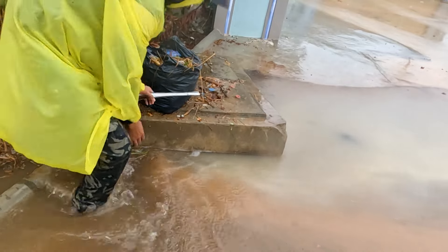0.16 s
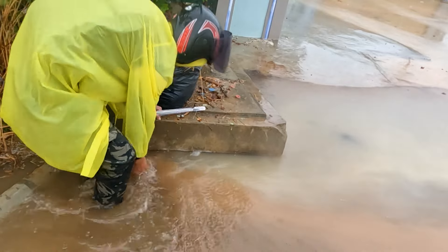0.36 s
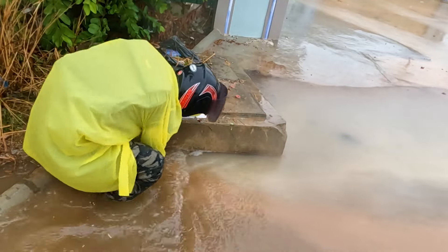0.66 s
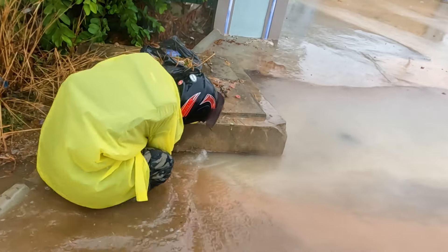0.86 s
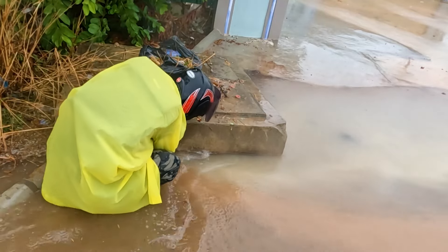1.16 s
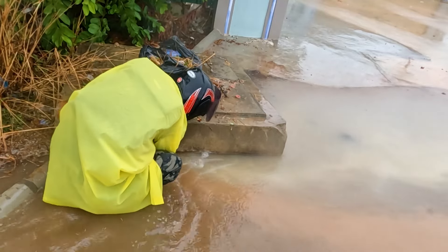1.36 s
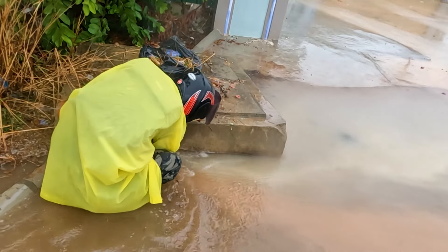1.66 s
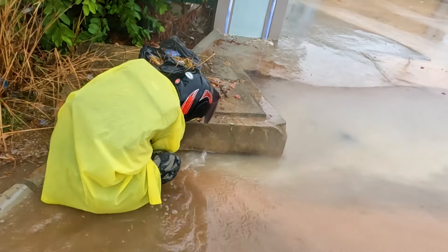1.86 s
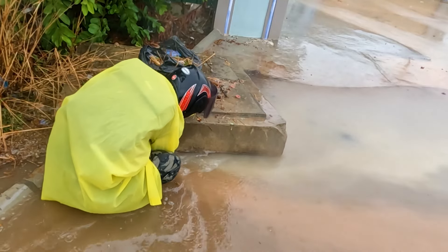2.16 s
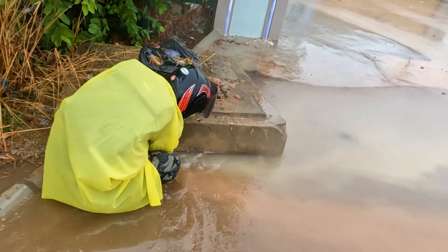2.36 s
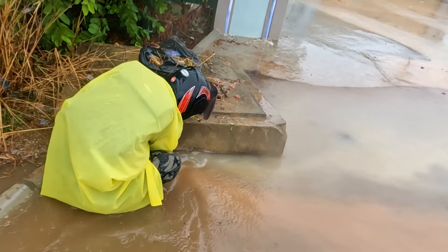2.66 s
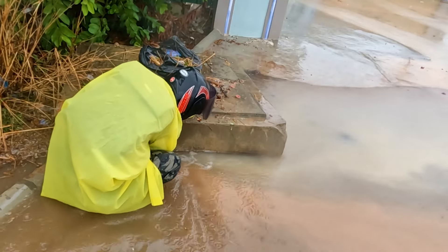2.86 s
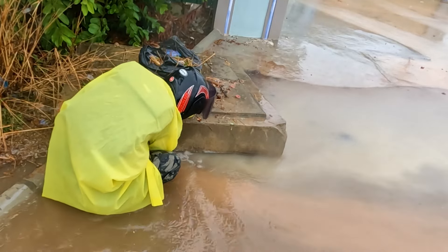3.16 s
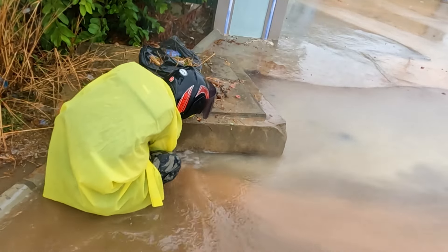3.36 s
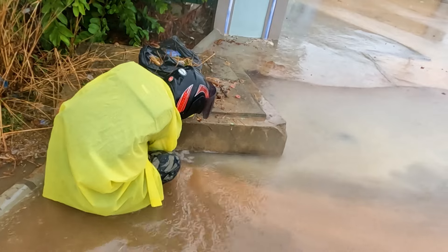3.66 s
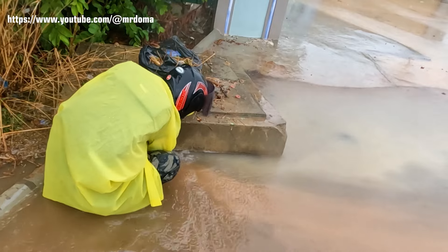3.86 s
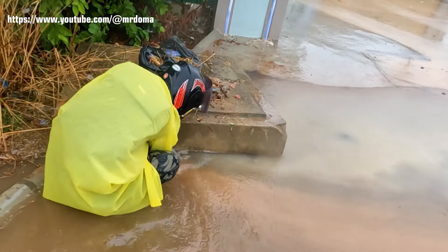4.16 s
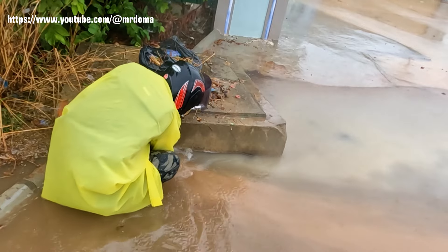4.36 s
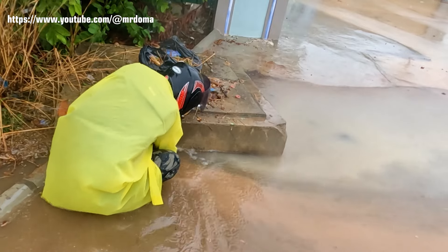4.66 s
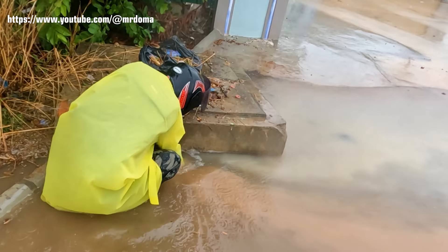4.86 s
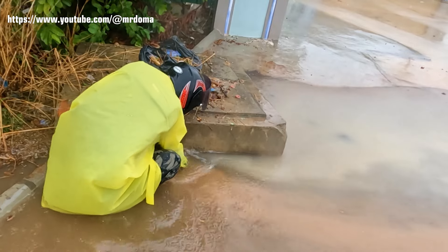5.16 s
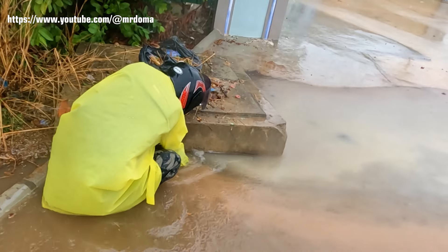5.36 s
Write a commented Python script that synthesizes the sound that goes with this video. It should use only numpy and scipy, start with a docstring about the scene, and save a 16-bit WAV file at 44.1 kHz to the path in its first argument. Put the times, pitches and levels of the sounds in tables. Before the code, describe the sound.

Muffled floodwater rushes and bubbles under low wind rumble, then a hollow whistling hiss opens as drops tick and knock on plastic.

```python
"""Floodwater runs along a kerb into a drain in rain and wind, heard by a microphone in a wet plastic housing.
The flow and gusts are shaped noise, dulled by the shell; splashing and bubbles add short grains and pings.
When the water film leaves the microphone port, its narrow channel resonates with the hiss of the water.
Drops tick at the port as cracks and decaying rings, and knock on the shell as damped modes.
A far engine hums in three drifting sine tones, and brief tonal streaks rise within the flow."""
import sys
import numpy as np
from scipy import signal
from scipy.io import wavfile
from scipy.ndimage import uniform_filter1d

SR = 44100
rng = np.random.default_rng(int(sys.argv[2]) if len(sys.argv) > 2 else 0)


def generate_wav(signal):
    """Clip the signal to [-1, 1] and save it as 16-bit WAV at the path in sys.argv[1]."""
    frames = np.transpose(np.atleast_2d(signal))
    scaled = np.clip(frames, -1, 1) * 32767
    pcm = np.round(scaled).astype(np.int16)
    wavfile.write(sys.argv[1], SR, pcm)


def nominal_scale(level):
    """Amplitude ratio for a level in decibels (scalar or array-like)."""
    x = np.asarray(level, float) / 20
    return 10 ** x


N = 242991  # samples
SEALED_S = 2.07  # until this second a water film covers the port

# Resonances of the port's air channel. Each row: centre in Hz, width in Hz, relative level in dB.
CHANNEL_MODES = [(1543, 110, 1), (1535, 460, 0.5), (4224, 130, -21), (4340, 650, -22.5), (5720, 480, -35),
                 (7920, 250, -47)]
# Drops at the port. Each row: start in seconds, low ring in Hz, its peak in dB, then the levels of the
# middle crack, the high ring and the treble crack in dB relative to that peak.
PORT_DROPS = [(0.0172, 1200, -33, -8, -22, -30), (0.0458, 1000, -29.5, -10, -23, -31),
              (0.052, 1180, -26.5, -13, -25, -30), (0.069, 1150, -32, -5, -24, -34),
              (0.099, 1150, -32.5, -13, -24, -28), (0.107, 1150, -41, 3, -26, -23.5),
              (0.136, 1150, -43, -10, -22, -34), (0.167, 1150, -48, 6, -19, -34),
              (0.276, 1150, -37.5, -4, -32, -44), (0.2835, 1200, -22.5, -14, -11.5, -24),
              (0.388, 1080, -26, -3.5, -14, -22), (0.5363, 1300, -34, -20, -32, -31),
              (0.593, 1150, -44, -3, -29, -43), (0.607, 1100, -31.5, -5, -19, -29),
              (0.804, 1110, -35.5, -3, -13, -20), (0.8728, 1150, -41, -6, -25, -20),
              (1.425, 1080, -22.5, -7, -16, -19.5), (1.5043, 1150, -33, -19, -32, -42),
              (1.553, 1150, -39, -16, -25, -28), (1.915, 1150, -38.5, -6, -20, -26),
              (2.047, 1150, -52, -12, -8, -18), (2.083, 1610, -28, -23, -26, -23.5),
              (2.187, 1600, -45.5, -22, -20, -14), (2.2, 1600, -47, -14, -1, -26),
              (2.473, 1550, -29, -34, -36, -40), (2.6117, 1570, -28.5, -22, -19, -18),
              (2.7122, 1600, -18.5, -21, -12, -12), (2.811, 1640, -17, -7.5, -7.5, -10.5),
              (2.857, 1500, -29, -30, -20, -36), (2.8735, 1600, -27.5, -26, -23, -16),
              (2.909, 1600, -42, -26, -26, -11), (2.9492, 1630, -11, -30, -13.5, -24),
              (3.034, 1590, -10.5, -48, -50, -53), (3.186, 1520, -24, -16, -31, -36),
              (3.2455, 1620, -15.5, -17, -22, -11), (3.316, 1500, -24.5, -27, -39, -30),
              (3.532, 1650, -21, -17, -6, -30), (3.884, 1550, -21, -27, -31, -40),
              (3.918, 1600, -25, -24, -32, -39), (4.032, 1710, -21, -11, -20, -23.5),
              (4.19, 1550, -14, -41, -39, -38), (4.288, 1600, -28, -24, -31, -37),
              (4.354, 1600, -30, -15, -22, -20), (4.369, 1580, -10, -19, -23.5, -15),
              (4.377, 1600, -26.5, -30, 1, -26), (4.4152, 1610, -20.5, -33, -35, -18),
              (4.443, 1600, -14.5, -38, -30, -33), (4.6511, 1570, -14, -32, -33, -42),
              (4.6843, 1700, -12, -26, -19.5, -33), (4.8821, 1600, -13.5, -39, -29, -44),
              (4.932, 1600, -27, -25, -34, -41), (5.033, 1520, -24, -27, -35, -41),
              (5.0429, 1700, -24, 1, -9.5, -37), (5.105, 1610, -17.5, -11, -28, -32),
              (5.273, 1620, -22, -13, -30, -32), (5.3227, 1570, -17.5, -23, -23, -37),
              (5.3427, 1620, -7, -37, -18.5, -31)]
# Modes of the plastic shell. Each row: nominal frequency in Hz, relative level in dB, t60 in seconds.
SHELL_MODES = [(314, -25.5, 0.13), (665, -10.5, 0.12), (906, -4.5, 0.019), (2060, -21.5, 0.0075)]


def even(x):
    """Normalisation by the mean square: the sound is scaled to an rms of 1."""
    return x / np.sqrt(np.mean(x ** 2) + 1e-20)


def read(points, hz):
    """A spectral envelope: levels in dB interpolated along logarithmic frequency."""
    f, value = np.transpose(points)
    return np.interp(np.log(hz + 1), np.log(f + 1), value)


def curve(rows, column):
    """A temporal envelope: one column interpolated linearly over the times in column 0."""
    return np.interp(np.arange(N) / SR, *np.transpose(rows)[[0, column]])


def add(mix, s, sound):
    """Superposition: a sound is added into the mix from second s, in place."""
    part = mix[round(s * SR):][:len(sound)]
    part += sound[:len(part)]


def split(x, hz):
    """Complementary zero-phase filtering: the parts of a sound below and above hz."""
    low = signal.sosfiltfilt(signal.butter(2, hz, fs=SR, output="sos"), x)
    return low, x - low


def swell(middle_s, length_s):
    """A Gaussian envelope of height 1, length_s wide where it has fallen to 1/e."""
    return np.exp(-(2 * (np.arange(N) / SR - middle_s) / length_s) ** 2)


def ring(hz, t60, rise_s):
    """A damped mode: exponential decay after a soft onset set by rise_s, envelope peak 1."""
    t = np.arange(SR // 5) / SR
    decay = nominal_scale(-60 * t / max(t60, 0.002))
    onset = np.exp(-max(rise_s, 1e-5) / (t + 1e-6))
    shape = decay * onset
    return shape / shape.max() * np.sin(2 * np.pi * hz * t)


def crack(lo_hz, hi_hz, t60):
    """An impulse and the decaying noise behind it excite a band-pass filter, peak 1."""
    t = np.arange(1500) / SR
    click = t == 0
    puff = nominal_scale(-17 - 60 * t / t60) * rng.standard_normal(len(t))
    band = signal.butter(4, [lo_hz, hi_hz], "bandpass", fs=SR, output="sos")
    burst = signal.sosfilt(band, click + puff)
    return burst / abs(burst).max()


def colour(x, gain, patchy_db, size):
    """Short-time spectral filtering by gain(hz), with random louder and softer patches, to rms 1."""
    hz, _, z = signal.stft(x, SR, nperseg=size, noverlap=size * 3 // 4)
    patches = rng.standard_normal(z.shape[::-1]).T
    patches = uniform_filter1d(patches, size=8, axis=0)
    patches = even(uniform_filter1d(patches, size=8, axis=1))
    z = z * gain(hz)[:, None] * nominal_scale(patchy_db * patches)
    shaped = signal.istft(z, SR, nperseg=size, noverlap=size * 3 // 4)[1]
    return even(shaped[:N])


def patter(per_s, spread_db, share):
    """Shot noise over smooth noise: random impulses of very unequal size mixed with a steady rush."""
    struck = rng.random(N) < per_s / SR
    drops = nominal_scale(spread_db * np.minimum(rng.exponential(1, N), 5)) * struck
    share = np.clip(share, 0, 1)
    grains = even(drops * rng.choice([-1, 1], N))
    return share * grains + (1 - share) * rng.standard_normal(N)


def bubbles(lo_hz, hi_hz, cycles, per_s, spread_db, glide):
    """Bubble resonance: short pings of rising pitch fall at random, a few of them large, to rms 1."""
    struck = rng.random(N) < per_s / SR
    size = nominal_scale(spread_db * np.minimum(rng.exponential(1, N), 4)) * struck
    kind = rng.integers(0, 16, N)  # which of 16 pitches
    t = np.arange(1500) / SR
    out = np.zeros(N)
    for k, hz in enumerate(np.geomspace(lo_hz, hi_hz, 16)):
        u = t * hz / cycles  # time in units of the ping's length
        ping = u * np.exp(-3 * u) * np.sin(2 * np.pi * hz * t * (1 + glide * u))
        out += signal.oaconvolve(size * (kind == k), ping)[:N]
    return even(out)


def spray_level():
    """Energy summation: steady splashing plus a decaying burst after each drop on the water film."""
    # Steady splashing heard through the shell. Each row: time in seconds, level in dB.
    steady = [(0, -43), (.45, -44), (.6, -44.5), (.75, -45.5), (1.3, -47), (1.5, -45), (1.7, -47),
              (2.0, -47.5), (2.5, -52.5), (5.4, -57.5)]
    t = np.arange(N) / SR
    power = nominal_scale(curve(steady, column=1)) ** 2
    for s, _, db, *_ in PORT_DROPS:
        if s < SEALED_S:
            decay_db = -60 * np.clip(t - s, 0, 1) / 0.35  # t60 of 0.35 s
            burst = nominal_scale(db - 17.5 + decay_db) * (t > s)
            power = power + burst ** 2
    return np.sqrt(power)


def flow_in_shell():
    """Transmission loss: the closed plastic dulls the rush of water and fine rain; splashing lies on top."""
    # Flow through the shell. Each row: time in seconds, level in dB, gain of the body above 410 Hz in dB.
    flow = [(0, -34, 7), (.7, -33, 5), (1.1, -31.5, 5.5), (1.7, -30, -3), (1.9, -37, 5.5), (2.3, -34, -3.5),
            (3.2, -33.5, 1), (4.8, -37, 3.5), (5.33, -33.5, 3.5), (5.51, -26.5, -11.5)]
    # Spectrum of the flow in the shell. Each row: frequency in Hz, relative density in dB per Hz.
    spectrum = [(59, -37.5), (100, -10.5), (150, 0.5), (221, -8), (311, -7.5), (363, -6), (450, -9),
                (651, -8.5), (801, -19.5), (1510, -33.5), (2710, -44), (3600, -53.5), (4600, -60),
                (6100, -66), (7200, -77), (8500, -110)]
    grains = patter(per_s=900, spread_db=2.5, share=0.27)
    rush = colour(grains, lambda hz: nominal_scale(read(spectrum, hz)), patchy_db=1.5, size=2048)
    body, spray = split(rush, hz=800)
    lower, upper = split(body, hz=410)
    body = lower + nominal_scale(curve(flow, column=2)) * upper
    drips = bubbles(lo_hz=1300, hi_hz=4200, cycles=5, per_s=600, spread_db=2.0, glide=0.12)
    # below 1 kHz the droplets keep the gain of 1 kHz
    droplets = colour(drips, lambda hz: nominal_scale(read(spectrum, np.maximum(hz, 1000))), patchy_db=0.0, size=256)
    splashing = even(spray) + nominal_scale(-12.5) * droplets
    return nominal_scale(curve(flow, column=1)) * body + spray_level() * splashing


def wind():
    """Turbulent pressure on the housing: lumpy low noise whose deepest throb swells on its own."""
    # Spectrum of the turbulence. Each row: frequency in Hz, relative density in dB per Hz.
    spectrum = [(4.7, -47.5), (8.0, -5.5), (21, -2), (29, -4), (41, -3.5), (60, -1), (82, -3), (113, -2),
                (170, -8), (278, -17.5), (313, -19), (421, -38.5), (500, -20), (650, -67), (1100, -120)]
    # Rumble above the throb. Each row: time in seconds, level in dB.
    gusts = [(0.0, -28), (0.38, -31.5), (0.67, -27.5), (0.95, -35), (1.64, -35), (2.04, -29), (2.92, -34),
             (3.15, -30), (3.78, -32), (3.97, -22), (4.14, -27), (4.45, -28), (4.65, -27.5), (4.83, -27),
             (4.92, -28), (5.05, -25.5), (5.17, -24), (5.27, -30.5), (5.39, -32), (5.51, -34.5)]
    # Deepest wind. Each row: time in seconds, level in dB, lean to the part below 36 Hz in dB.
    throb = [(0, -28, -4.5), (.4, -28, -3.5), (.75, -28, -2), (1.1, -30, -1.5), (1.65, -30.5, 0.5),
             (2, -34, -0.5), (2.3, -32, -3), (2.7, -32.5, -1), (3.15, -27.5, -0.5), (3.7, -33, 0.5),
             (3.95, -27.5, 0), (4.15, -26.5, 0.5), (4.45, -32.5, 2.5), (4.7, -30.5, 8.5),
             (4.9, -25.5, 12.5), (5.15, -23, 7.5), (5.3, -26, 3), (5.51, -31.5, -0.5)]
    lumps = colour(rng.standard_normal(N), lambda hz: nominal_scale(read(spectrum, hz)), patchy_db=1.25, size=4096)
    deep, rumble = split(lumps, hz=58.6)
    lowest, rest = split(deep, hz=36)
    lean = nominal_scale(curve(throb, column=2) / 2)  # half up on one part, half down on the other
    deep = even(lowest * lean + rest / lean)
    return nominal_scale(curve(throb, column=1)) * deep + nominal_scale(curve(gusts, column=1)) * even(rumble)


def hum():
    """Frequency modulation: three low engine tones about an octave apart share a slow drift in pitch."""
    # The two lower tones. Each row: time in seconds, rms of the low tone in dB, rms of its octave in dB.
    lower_tones = [(.12, -45, -46), (.3, -26, -55), (.5, -45, -47), (.75, -44, -53), (.88, -34, -53.5),
                   (1.1, -29.5, -52.5), (1.2, -57, -49.5), (2.9, -51.5, -46.5), (3.2, -45, -40.5),
                   (4.5, -41, -41.5), (5.0, -38.5, -56.5), (5.4, -47, -38)]
    # The tone two octaves up. Each row: time in seconds, rms in dB.
    top_tone = [(0, -49.5), (3.6, -53.5), (3.9, -50), (5.2, -44), (5.4, -58)]
    # Mean frequencies of the three tones in Hz, low to high.
    tones_hz = (152, 313, 641.6)
    drift = even(uniform_filter1d(rng.standard_normal(N), size=9000))
    seconds = np.cumsum(1 + 0.00521 * drift) / SR  # time that runs a little fast and slow
    levels_db = curve(lower_tones, column=1), curve(lower_tones, column=2), curve(top_tone, column=1)
    tones = (nominal_scale(db) * np.sin(2 * np.pi * hz * seconds) for db, hz in zip(levels_db, tones_hz))
    return np.sqrt(2) * sum(tones)


def small_knocks():
    """Modal excitation at random: each light drop gives every mode of the shell its own share."""
    # Light drops together. Each row: time in seconds, level in dB.
    level = [(0, -52), (1.5, -53.5), (2.2, -58), (3.5, -48), (4.6, -46), (5.3, -39.5), (5.51, -51)]
    struck = rng.random(N) < 110 / SR  # 110 drops a second
    size = nominal_scale(2.4 * np.minimum(rng.exponential(1, N), 2.5)) * struck
    share = rng.random((N, len(SHELL_MODES))) ** 2
    out = np.zeros(N)
    for k, (hz, db, t60) in enumerate(SHELL_MODES):
        mode = nominal_scale(db) * ring(hz, t60, rise_s=0.00083)
        out += signal.oaconvolve(size * share[:, k], mode)[:N]
    return nominal_scale(curve(level, column=1)) * even(out)


def streaks():
    """Narrow-band tones: sines under Gaussian envelopes swell and fade within the rush."""
    # Each row: middle in seconds, length in seconds, frequency in Hz, rms at the middle in dB.
    rows = [(0.024, 0.055, 153, -34), (0.311, 0.44, 200.3, -37.5), (0.308, 0.24, 356.5, -40.5),
            (0.669, 0.12, 204.5, -34.5), (0.95, 0.073, 571, -38), (1.147, .07, 622, -34),
            (0.95, 0.13, 365, -35.5), (0.997, 0.27, 459, -39), (1.132, 0.46, 528.6, -36.5),
            (1.249, 0.32, 488, -38), (1.408, 0.25, 286.8, -36), (1.551, 0.38, 166.1, -36),
            (1.597, 0.34, 376.7, -38.5), (1.687, 0.17, 334, -37)]
    t = np.arange(N) / SR
    tones = (nominal_scale(db) * swell(s, length) * np.sin(2 * np.pi * hz * t) for s, length, hz, db in rows)
    return np.sqrt(2) * sum(tones)


def ticks():
    """Impulsive excitation: drops crack and ring the channel; the film smears the high ring into noise."""
    out = np.zeros(N)
    for s, low_hz, db, middle_db, high_db, treble_db in PORT_DROPS:
        if s < SEALED_S:
            high = crack(lo_hz=3600, hi_hz=4870, t60=0.016)
            middle = crack(lo_hz=1350, hi_hz=2650, t60=0.01)
            top_db = treble_db - 22
        else:
            high = ring(CHANNEL_MODES[2][0], t60=0.015, rise_s=0.00016)
            middle = crack(lo_hz=1850, hi_hz=2870, t60=0.01)
            top_db = treble_db - 17
        add(out, s, nominal_scale(db) * ring(low_hz, t60=0.0099, rise_s=0.00098))
        add(out, s, nominal_scale(db + high_db) * high)
        add(out, s, nominal_scale(db + middle_db) * middle)
        add(out, s, nominal_scale(db + treble_db) * crack(lo_hz=4680, hi_hz=6090, t60=0.0087))
        add(out, s, nominal_scale(db + top_db) * crack(lo_hz=7440, hi_hz=8740, t60=0.0065))
    return out


def splashes():
    """Amplitude-modulated grainy noise: bright bursts of spray as drops splash on the wet housing."""
    # Bursts of spray. Each row: middle in seconds, length in seconds, level in dB.
    bursts = [(.055, .04, -58.5), (0.128, 0.064, -60), (0.167, 0.025, -61), (.275, .03, -55),
              (0.316, 0.055, -59), (.425, 0.037, -59), (0.564, 0.014, -58), (0.593, 0.032, -52),
              (.81, .04, -60), (1.435, .05, -68)]
    # Spectrum of the spray. Each row: frequency in Hz, relative density in dB per Hz.
    spectrum = [(900, -28), (1600, -1.5), (2800, 1.5), (3600, -7), (4400, -13.5), (6000, -22), (7200, -44),
                (8500, -79)]
    grains = patter(per_s=1600, spread_db=2.5, share=0.4)
    spray = colour(grains, lambda hz: nominal_scale(read(spectrum, hz)), patchy_db=2.0, size=256)
    return sum(nominal_scale(db) * swell(s, length) for s, length, db in bursts) * spray


def knocks():
    """Modal synthesis: drops ring the shell; where each lands tilts the modes and shifts the damped ones."""
    # Each row: start in seconds, level in dB, damped middle mode in Hz, tilt to upper modes in dB per octave.
    drops = [(0.046, -15.5, 890, 5), (0.076, -21, 800, -16), (0.097, -21.5, 854, -13),
             (0.119, -19.5, 800, -23), (0.14, -26, 950, -0.5), (0.153, -18.5, 800, -21),
             (0.205, -26.5, 840, -8), (0.281, -17.5, 1120, -1), (0.642, -34, 805, 1.5),
             (0.933, -22, 870, -20.5), (0.942, -25, 860, 5), (1.128, -24, 955, -27), (1.222, -29.5, 950, 9),
             (1.412, -27, 940, 17), (1.425, -19, 937, 13), (1.469, -21.5, 1010, -26),
             (1.683, -23, 810, -21), (2.233, -35, 850, -21), (2.607, -40, 850, -11), (2.619, -26, 854, 26),
             (2.696, -24.5, 884, -5), (2.906, -28, 870, -20), (2.949, -23.5, 950, 22),
             (3.02, -24.5, 920, -4), (3.105, -32, 880, -6), (3.355, -19, 835, -12), (3.442, -20.5, 810, 1),
             (3.537, -13, 906, -0.5), (3.601, -7, 868, 0.5), (3.627, -17, 856, 7), (3.685, -20, 910, -1),
             (3.706, -18.5, 880, -12), (3.83, -24, 915, 27), (3.86, -28, 930, 28), (3.917, -21.5, 900, 6),
             (4.119, -21.5, 880, 4), (4.147, -21.5, 864, -6), (4.188, -19, 990, 23), (4.259, -28, 920, 22),
             (4.316, -10, 864, 12), (4.344, -24, 830, 8), (4.396, -24.5, 940, 19.5), (4.405, -18, 930, 14),
             (4.467, -24.5, 870, -13), (4.523, -27, 880, -7), (4.651, -23, 880, 19), (4.757, -17, 950, 2),
             (4.837, -19, 914, 14), (4.856, -16, 880, 2), (4.881, -13.5, 926, 14), (4.946, -16, 884, 18),
             (5.046, -13, 860, -1), (5.106, -19, 910, 8), (5.168, -25, 880, -9.5), (5.203, -10.5, 884, 10),
             (5.233, -15.5, 954, 11), (5.281, -14.5, 800, -12), (5.335, -25, 915, 25),
             (5.453, -22.5, 990, -1)]
    out = np.zeros(N)
    for s, db, middle_hz, tilt_db in drops:
        bend = rng.standard_normal()
        for hz, mode_db, t60 in SHELL_MODES:
            damped = hz > SHELL_MODES[1][0]
            shift = middle_hz / SHELL_MODES[2][0] if damped else 1 + 0.0034 * bend
            lean_db = tilt_db * np.clip(np.log2(hz / 780), -0.3, 0.3)  # tilt held beyond 0.3 octave
            add(out, s, nominal_scale(db + mode_db + lean_db) * ring(hz * shift, t60, rise_s=0.00083))
    return out


def splats():
    """Broadband transients: drops that burst wide fill the gap between the channel resonances."""
    # Each row: start in seconds, peak in dB, lower band edge in Hz, upper band edge in Hz.
    drops = [(0.05, -41, 2500, 3200), (0.276, -37, 1500, 3000), (0.291, -48, 1800, 4500),
             (0.3875, -39, 2400, 3700), (2.082, -39, 2600, 4000), (2.7126, -42, 2800, 4000),
             (2.812, -47, 2700, 4000), (2.949, -39, 2600, 4000), (3.246, -35, 3250, 4260),
             (3.532, -37.5, 2600, 4000), (4.0316, -38, 3100, 4060), (4.19, -46, 2600, 4000),
             (4.37, -34, 3260, 4200), (4.6507, -45, 2300, 3300), (4.684, -25.5, 3200, 4930),
             (4.8812, -43, 2700, 4500), (5.0435, -30.5, 2000, 3380), (5.3422, -28.5, 2580, 4000)]
    out = np.zeros(N)
    for s, db, lo_hz, hi_hz in drops:
        add(out, s, nominal_scale(db) * crack(lo_hz, hi_hz, t60=0.0097))
    return out


def port_gain(hz):
    """Resonance of a narrow air channel; a steep roll-off ends the hiss above about 9 kHz."""
    # Response between the resonances. Each row: frequency in Hz, relative level in dB.
    skirt = [(500, -15.5), (1000, -8), (2000, -19), (3200, -35), (5000, -30.5), (6000, -44.5),
             (7100, -76.5), (8600, -69), (9600, -98.5), (12000, -120)]
    peaks = sum(nominal_scale(db) ** 2 / (1 + (2 * (hz - f) / width) ** 2) ** 2 for f, width, db in CHANNEL_MODES)
    roll_off = 1 / (1 + (hz / 9300) ** 16)
    return roll_off * np.sqrt(peaks + nominal_scale(read(skirt, hz)) ** 2)


def hiss_in_port():
    """Resonant filtering of noise: spray and small drops excite the channel once the water film opens it."""
    # Hiss through the port. Each row: time in seconds, level in dB, gain of its treble in dB.
    opening = [(2.05, -53, 1), (2.2, -51.5, 0), (2.35, -47.5, 0.5), (2.5, -45, 1), (2.65, -41.5, 0.5),
               (2.9, -40, 1), (3.19, -36, 0.5), (3.5, -35, 1), (3.75, -34.5, 0), (4.15, -33.5, 1),
               (4.4, -33.5, 2.5), (4.6, -31.5, 1), (4.85, -31.5, 0), (5.19, -30.5, 0.5), (5.33, -35, -0.5),
               (5.51, -33, 0)]
    # A drop half closes the port again: start in seconds, change of level in dB.
    reseal = (5.348, -6.5)
    t = np.arange(N) / SR
    unsealed = np.clip((t - SEALED_S) / 0.11, 0, 1)
    open_db = curve(opening, column=1) + reseal[1] * np.clip((t - reseal[0]) / 0.007, 0, 1)
    grains = patter(per_s=1800, spread_db=3.5, share=0.25)
    low, treble = split(colour(grains, port_gain, patchy_db=1.25, size=1024), hz=2700)
    hiss = low + nominal_scale(curve(opening, column=2)) * treble
    trickle = bubbles(lo_hz=1470, hi_hz=1714, cycles=14, per_s=600, spread_db=3.0, glide=0.033)
    fine_drops = bubbles(lo_hz=1400, hi_hz=1780, cycles=4.5, per_s=130, spread_db=3.5, glide=0.01)
    return unsealed * nominal_scale(open_db) * (hiss + nominal_scale(-10.5) * trickle + nominal_scale(-13.5) * fine_drops)


def buffets():
    """Turbulent bursts: sharper lumps of wind on the housing reach higher than the steady rumble."""
    # Each row: middle in seconds, length in seconds, level in dB.
    bursts = [(3.558, .07, -32.5), (3.721, 0.045, -24.5), (3.922, 0.07, -24.5), (4.039, 0.052, -24),
              (4.287, 0.064, -30), (4.416, 0.039, -28.5), (4.83, 0.057, -32), (4.977, 0.044, -28),
              (5.064, 0.064, -27), (5.13, 0.076, -31.5)]
    # Spectrum of the buffets. Each row: frequency in Hz, relative density in dB per Hz.
    spectrum = [(60, -24), (110, 15), (190, 5), (300, -8), (450, -49.5), (700, -87.5), (1000, -140)]
    lumps = colour(rng.standard_normal(N), lambda hz: nominal_scale(read(spectrum, hz)), patchy_db=-4.0, size=4096)
    return sum(nominal_scale(db) * swell(s, length) for s, length, db in bursts) * lumps


def scene():
    """Linear superposition of all sources at the single microphone."""
    water = flow_in_shell() + splashes() + hiss_in_port()
    air = wind() + buffets()
    tones = hum() + streaks()
    drops = small_knocks() + ticks() + knocks() + splats()
    return (water + air + tones + drops)[None]


def low_pass(x):
    """Removes everything above the highest recorded frequency."""
    return signal.sosfilt(signal.butter(12, 12800, fs=SR, output="sos"), x)


def record(dry):
    """Windowing: a squared-sine taper over the last 130 samples avoids a click at the end."""
    samples_left = np.arange(N)[::-1]
    taper = np.sin(np.pi / 2 * np.clip(samples_left / 130, 0, 1)) ** 2
    return low_pass(dry * taper)


dry = scene()
out = record(dry)
generate_wav(out)
```